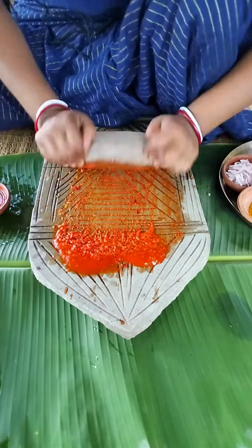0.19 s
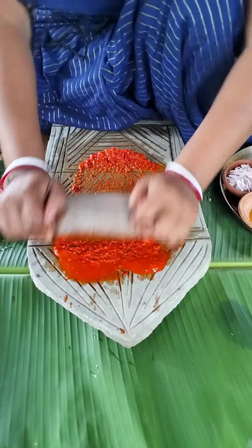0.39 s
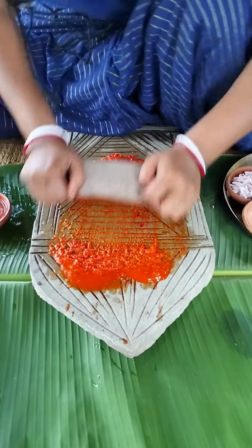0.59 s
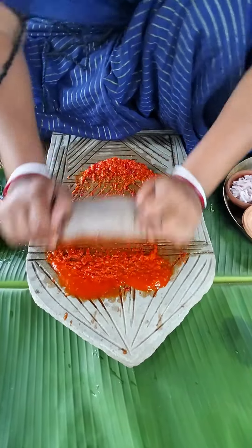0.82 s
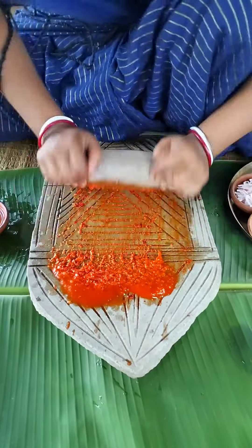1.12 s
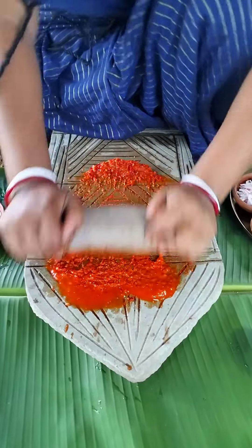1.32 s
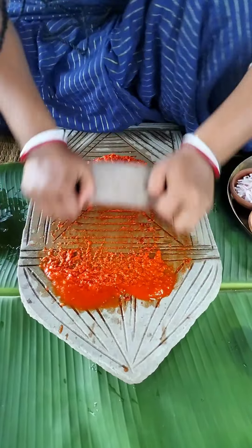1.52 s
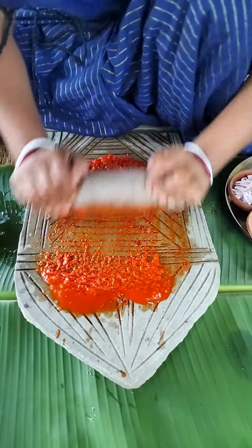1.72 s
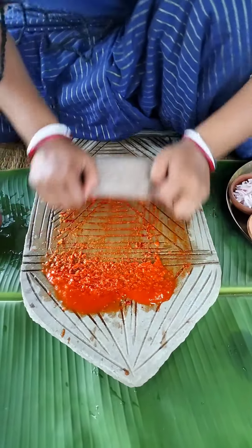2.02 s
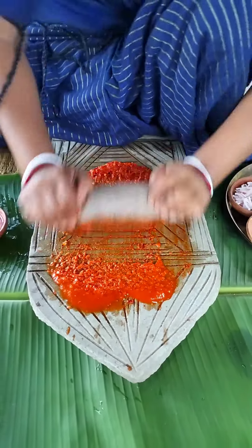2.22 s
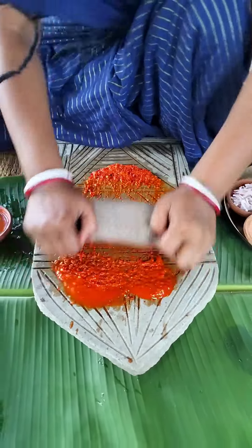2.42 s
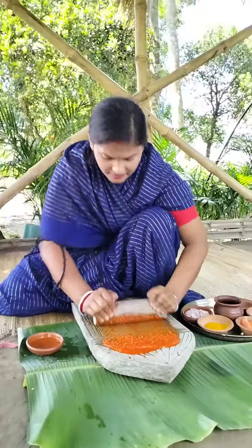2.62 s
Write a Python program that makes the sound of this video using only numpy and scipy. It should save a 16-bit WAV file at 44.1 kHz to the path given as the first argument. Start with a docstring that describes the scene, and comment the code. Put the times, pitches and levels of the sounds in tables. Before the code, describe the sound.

A stone roller scrapes wet, gritty paste over a grooved slab for nearly three seconds. Muffled rasping pushes start near 0, 0.4, 0.9, 1.35, 1.8 and 2.3 s; pulls between them squeak around 830 Hz, loudest near 1.7 s. Grit cracks, paste hisses and smacks, the slab knocks dully. Faint whistles glide early. Low air buffets hit the close stereo microphone, hardest right at 2.26 s, over soft outdoor hush.

```python
"""A stone roller is pushed and pulled over wet spice paste on a grooved slab, about two round trips a second.
Crushed grit rasps in the stones' resonances; the roller catches on grooves in short squeaky rings.
Grit cracks, the paste hisses and smacks, and the slab knocks dully. Faint whistles slide in pitch.
Air buffets the two microphone ports in low thumps, over a quiet outdoor hush."""
import sys
import numpy as np
from scipy import signal
from scipy.fft import rfft, irfft, next_fast_len
from scipy.io import wavfile
from scipy.ndimage import uniform_filter1d, minimum_filter1d, map_coordinates

SR = 44100
rng = np.random.default_rng(int(sys.argv[2]) if len(sys.argv) > 2 else 0)


def unload_wav(signal):
    """Save mono or channel-first audio to the path in sys.argv[1] as 16-bit WAV at rate SR, clipped to [-1, 1]."""
    wavfile.write(
        sys.argv[1],
        SR,
        np.round(np.clip(np.atleast_2d(signal).T, -1, 1) * 32767).astype(np.int16),
    )


N = 123480  # length in samples: 2.8 s

# forward strokes (start [s], length [s], ring [dB], rasp [dB], scrape [dB]); ring and rasp before muffling
PUSHES = [(-.06, 0.22, -26, -33, -42), (.42, 0.22, -26.5, -33.5, -44), (.885, 0.2, -25.5, -32.5, -40),
          (1.35, 0.23, -27.5, -36, -42), (1.825, 0.23, -23, -33, -39.5), (2.315, 0.24, -27.5, -34, -39.5)]
# backward strokes, same columns
PULLS = [(.195, 0.25, -30.5, -41, -48), (.66, 0.23, -29.5, -40.5, -47), (1.13, 0.22, -28.5, -34.5, -42.5),
         (1.61, 0.22, -28.5, -32.5, -43.5), (2.068, 0.26, -27.5, -36, -43.5), (2.68, 0.27, -34, -40, -43.5)]
# how each layer follows a stroke: (attack, hold, release) [shares of the stroke's length]
PUSH_SHAPE = {"ring": (0.18, 0.33, 0.3), "rasp": (0.043, 0.24, 0.6), "scrape": (0.34, 0.2, 0.59)}
PULL_SHAPE = {"ring": (0.066, 0.39, 0.45), "rasp": (0.1, 0.2, 0.57), "scrape": (0.13, 0.19, 1)}
# the roller's resonances on a pull (pitch [Hz], width [Hz], level [dB])
ROLLER_MODES = [(820, 27.5, 5), (2031, 45, -14.5)]
# resonances that grit excites in the two stones (pitch [Hz], width [Hz], level [dB])
STONE_MODES = [(461.5, 33, 7), (1078, 122, 7), (1420, 210, -7.5), (1746, 127, -3), (1970, 37, -2)]
# leaning on the roller widens its resonances and lowers them
PUSH_DAMPING, PUSH_DETUNE_HZ = 1.37, -4
# tone colour of the scrape and of the paste's fizz (frequency [Hz], relative level [dB])
SCRAPE_COLOUR = [(200, 14), (1500, -3), (3450, 4), (4400, 6), (7000, -0.5), (8600, -8.5), (15000, -10)]
PASTE_COLOUR = [(1000, -95), (7500, -1), (8900, -18), (10300, 0), (12500, -0.5), (16000, -16)]
PASTE_DB = -7.5  # fizz, relative to the scrape
# tone colour of the air rumble (frequency [Hz], relative level [dB])
AIR_COLOUR = [(20, -38), (45, 1), (110, 0.5), (250, -13.5), (2000, -68)]
# air rumble on each port (time [s], level [dB])
AIR_LEFT = [(.33, -30.5), (.47, -15.5), (.6, -27.5), (.8, -21.5), (.95, -34.5), (2.2, -31), (2.54, -24),
            (2.57, -39)]
AIR_RIGHT = [(.2, -27), (.64, -30.5), (.74, -20.5), (.85, -32.5), (1.08, -19), (1.2, -31), (1.719, -36.5),
             (1.95, -17), (2.08, -24), (2.25, -14), (2.541, -18.5), (2.571, -41)]
# single buffets of air on the left, then the right port (time [s], peak level [dB])
PUFFS = {"left": [(.491, -12.5), (.625, -10), (2.285, -14)], "right": [(.102, -14), (1.288, -10),
         (1.438, -10.5), (1.826, -11), (1.936, -7), (2.003, -5), (2.111, -8), (2.241, -10), (2.262, 0.5)]}
PUFF_HZ, PUFF_WIDTH_S = 90, 0.0071  # middle pitch, scattered for each puff; time to fall to 1/e
# tone colour of the outdoor hush (frequency [Hz], relative level [dB])
HUSH_COLOUR = [(300, 4.5), (1400, 8), (8800, -10), (12000, -4.5)]
HUSH_DB = -48.5
# low resonances of the slab (pitch [Hz], width [Hz], level [dB])
SLAB_MODES = [(467, 20, -6), (376, 62, -7)]
# the slab rocks dully as the roller turns (time [s], level [dB])
ROCKS = [(0.098, -27.5), (1.02, -33), (1.509, -31), (2.583, -29.5)]
ROCK_T60_S = 0.11  # time to fade by 60 dB, as for every T60 here
# wet paste smacks (time [s], level [dB])
SMACKS = [(.113, -37.5), (.375, -31), (0.606, -37), (.838, -32.5), (0.886, -32), (1.073, -32.5),
          (1.21, -29.5), (1.324, -34), (1.545, -30), (1.79, -29.5), (2.265, -32), (2.55, -37), (2.632, -34),
          (2.664, -33.5)]
# tone colour of a smack (frequency [Hz], relative level [dB])
SMACK_COLOUR = [(400, -51), (1100, -3.5), (7500, 8), (11500, 9), (16000, 6.5)]
SMACK_T60_S = 0.036
# faint whistling glides late in the forward strokes (start [s], first pitch [Hz], last pitch [Hz])
GLIDES = [(0.121, 1650, 1420), (.55, 1630, 1480), (1.04, 1270, 1526)]
GLIDE_S, GLIDE_DB = 0.072, -50.5  # length, peak level
# the roller catches on a groove (time [s], level [dB], pitch [Hz])
CATCHES = [(.222, -14.5, 827), (.237, -17, 832), (.293, -12.5, 833), (.441, -17, 802), (.725, -14, 815),
           (.753, -14.5, 770), (.762, -9, 837), (1.172, -14.5, 828), (1.2, -7.5, 834.5), (1.222, -9, 830),
           (1.234, -14, 860), (1.634, -11.5, 829), (1.671, -7, 834), (1.683, -0.5, 819), (1.696, -3.5, 816),
           (2.109, -14, 850), (2.14, -8, 839.5), (2.155, -7.5, 850), (2.17, -8, 836), (2.228, -20, 820),
           (2.325, -18, 870), (2.4, -13.5, 812), (2.527, -19.5, 860), (2.582, -18, 847.5),
           (2.743, -18.5, 878)]
CATCH_ATTACK_S, CATCH_HOLD_S, CATCH_T60_S = 0.0039, 0.0069, 0.063
CATCH_ROUGH = 0.15  # grit roughens the ring by this share
# hard grit cracks under the roller (time [s], level [dB])
CRACKS = [(0.223, -18.5), (0.247, -20.5), (0.38, -28), (0.444, -22.5), (1.683, -11.5), (1.695, -16.5),
          (2.108, -18.5), (2.162, -17.5), (2.528, -24)]
ROOM_T60_S, ROOM_DB = 0.07, -8.5  # fading and level of the reflections
RIGHT_DB = 2  # scrape, paste and cracks are this much stronger on the right
LEFT_LEAD_S = .00006  # the work reaches the left port first by this time
TOP_HZ = 15700  # nothing is kept from here up


def amp(db):
    """Turn dB into a plain gain."""
    return 10 ** (np.asarray(db) / 20)


def unit(x):
    """Scale x to an average strength (rms) of 1."""
    return x / np.sqrt(np.mean(x ** 2) + 1e-20)


def wobble(rate):
    """A smooth random curve through `rate` random points a second."""
    points = rng.standard_normal(int(N * rate / SR) + 4)
    return map_coordinates(points, [np.arange(N) * rate / SR])


def filtered(x, response):
    """Multiply the spectrum of x by a response that depends on frequency."""
    m = next_fast_len(N + SR // 2)
    spectrum = rfft(x, m) * response(np.fft.rfftfreq(m, 1 / SR))
    return irfft(spectrum, m)[..., :N]


def coloured(x, points):
    """Give x a tone colour from (frequency [Hz], level [dB]) points, at rms 1."""
    f, db = np.transpose(points)
    return unit(filtered(x, lambda hz: amp(np.interp(np.log(hz + 1), np.log(f), db))))


def resonated(x, modes, level=1):
    """Let x, at a given level curve, excite resonances; a steady level of 1 gives rms 1."""
    def body(f):
        return sum(amp(db) * 1j * f * w / (c * c - f * f + 1j * f * w) for c, w, db in modes)
    return filtered(level * x, body) / np.std(filtered(x, body))


def grains(rate, spread_db, apart):
    """Tiny random ticks of scattered size in stereo; `apart` sets the part the ports do not share."""
    present = rng.random((3, N)) < rate / SR
    heights = rng.standard_normal((3, N))
    scatter = np.clip(rng.standard_normal((3, N)), -2, 2)
    hits = present * heights * amp(spread_db * scatter)
    return unit(hits[0] + apart * hits[1:])


def burst(start, t60):
    """Level curve of a sudden sound that dies away."""
    t = np.maximum(np.arange(N) / SR - start, 0)
    attack = 1 - np.exp(-t / .0003)
    return attack * amp(-60 * np.minimum(t / t60, 2))


def swell(start, length, attack, hold, release):
    """Level curve of one stroke: it rises, holds, then loses 20 dB per release."""
    u = (np.arange(N) / SR - start) / length
    return np.clip(u / attack, 0, 1) * amp(-20 * np.maximum(u - attack - hold, 0) / release)


def effort(layer, ways=("push", "pull")):
    """Level of one layer over all strokes in the given directions."""
    level = np.zeros(N)
    for way in ways:
        strokes, shape = (PUSHES, PUSH_SHAPE) if way == "push" else (PULLS, PULL_SHAPE)
        for start, length, ring_db, rasp_db, scrape_db in strokes:
            db = {"ring": ring_db, "rasp": rasp_db, "scrape": scrape_db}[layer]
            level += amp(db) * swell(start, length, *shape[layer])
    return level


def leaning_right(x):
    """Raise the right side and lower the left by equal amounts."""
    return x * amp([[-RIGHT_DB / 2], [RIGHT_DB / 2]])


def radiated(x):
    """The small roller gives off little bass, and the paste muffles its top."""
    band = signal.butter(2, [480, 2900], "bandpass", fs=SR, output="sos")
    return signal.sosfilt(band, x)


def grinding():
    """Crushed grit excites the stones in a judder; the paste fizzes under the roller."""
    judder = wobble(130)
    slips = grains(rate=900, spread_db=-0.5, apart=0.26)
    pressed = [(hz + PUSH_DETUNE_HZ, width * PUSH_DAMPING, db) for hz, width, db in ROLLER_MODES]
    push_ring = effort("ring", ["push"]) * resonated(slips, pressed)
    pull_ring = effort("ring", ["pull"]) * resonated(slips, ROLLER_MODES)

    grit = grains(rate=800, spread_db=3, apart=.65) * amp(2.5 * judder)
    rasp = effort("rasp") * resonated(grit, STONE_MODES)

    scraping = grains(rate=7000, spread_db=6.0, apart=3.9) * amp(2.0 * judder)
    scrape = coloured(scraping, SCRAPE_COLOUR)
    fizz = grains(rate=6000, spread_db=4, apart=1.3) * amp(2.5 * wobble(90))
    paste = amp(PASTE_DB) * coloured(fizz, PASTE_COLOUR)
    hiss = effort("scrape") * (scrape + paste)
    return radiated(push_ring + pull_ring + rasp) + leaning_right(hiss)


def air():
    """Moving air makes a lumpy rumble, different on each port, with single stronger buffets."""
    t = np.arange(N) / SR
    level = np.array([amp(np.interp(t, *np.transpose(port))) for port in (AIR_LEFT, AIR_RIGHT)])
    lumps = amp(4 * np.array([wobble(45), wobble(45)]))
    out = level * coloured(rng.standard_normal((2, N)) * lumps, AIR_COLOUR)
    for port, puffs in enumerate(PUFFS.values()):
        for (start, db), scatter in zip(puffs, rng.standard_normal(len(puffs))):
            u = t - start
            hz = PUFF_HZ * np.exp(0.28 * scatter)
            bump = np.exp(-(u / PUFF_WIDTH_S) ** 2)
            out[port] -= amp(db) * bump * np.cos(2 * np.pi * hz * u)
    return out


def hush():
    """A quiet, steady outdoor background made of dense random ticks."""
    return amp(HUSH_DB) * coloured(grains(rate=SR, spread_db=3, apart=1.4), HUSH_COLOUR)


def slab():
    """The slab knocks softly on its bed: noise in its low resonances, in dying bursts."""
    level = sum(amp(db) * burst(start, ROCK_T60_S) for start, db in ROCKS)
    return level * resonated(rng.standard_normal(N), SLAB_MODES)


def smacks():
    """Wet paste lets go of the roller in brief crackles."""
    level = sum(amp(db) * burst(start, SMACK_T60_S) for start, db in SMACKS)
    crackle = grains(rate=12000, spread_db=3, apart=1.3)
    return leaning_right(level * coloured(crackle, SMACK_COLOUR))


def glides():
    """Thin, faint whistles: sine tones that slide in pitch, rising and fading in level."""
    out = np.zeros(N)
    for start, first_hz, last_hz in GLIDES:
        u = np.clip((np.arange(N) / SR - start) / GLIDE_S, 0, 1)
        hz = first_hz + (last_hz - first_hz) * u
        out += np.sin(np.pi * u) * np.sin(2 * np.pi * np.cumsum(hz) / SR)
    return amp(GLIDE_DB) * out


def catches():
    """Each catch on a groove stops the last ring and sets the roller ringing anew."""
    ring = np.zeros(N)
    for start, db, hz in CATCHES:
        t = np.maximum(np.arange(N) / SR - start, 0)
        ring *= np.clip(1 - t / CATCH_ATTACK_S, 0, 1)  # the old ring stops
        live = (t > 0) & (t < 2 * CATCH_T60_S)
        t = t[live]
        fade_db = -60 * np.maximum(t - CATCH_HOLD_S, 0) / CATCH_T60_S
        attack = np.minimum(t / CATCH_ATTACK_S, 1)
        ring[live] += amp(db + fade_db) * attack * np.sin(2 * np.pi * hz * t)
    return ring * (1 + CATCH_ROUGH * wobble(900))


def cracks():
    """Grit snaps between the stones: one hard, bright blow to their resonances."""
    blow = np.gradient(1. * (np.arange(N) == 1))
    ringing = resonated(blow, STONE_MODES)
    knock = radiated(radiated(ringing))[:SR // 10]  # doubly muffled under the roller
    hits = np.zeros(N)
    for start, db in CRACKS:
        hits[round(start * SR)] = amp(db)
    return leaning_right(signal.fftconvolve(hits, knock / np.abs(knock).max())[:N])


def shelter(x):
    """Short reflections from the ground and the open shelter: a fading tail of random echoes."""
    t = np.arange(SR // 4) / SR
    fade = amp(-60 * t / ROOM_T60_S) * (t > .004)  # no echo in the first 4 ms
    tail = rng.standard_normal((2, len(t))) * fade
    return signal.fftconvolve(x, tail / np.linalg.norm(tail[0]), axes=1)[:, :N]


def scene():
    """The stones and paste, their reflections, the whistles, the air and the hush."""
    work = grinding() + slab() + smacks() + catches() + cracks()
    # shift the two sides in time by half the lead each, left earlier and right later
    work = filtered(work, lambda hz: np.exp(1j * np.pi * LEFT_LEAD_S * np.outer([1, -1], hz)))
    return work + amp(ROOM_DB) * shelter(work) + glides() + air() + hush()


def record(dry):
    """A limiter turns both sides down at the strongest peaks; then the band limit cuts the top."""
    need = np.minimum(1, .9 / (np.abs(dry).max(axis=0) + 1e-20))
    gain = uniform_filter1d(minimum_filter1d(need, size=440), size=440)  # smoothed over about 10 ms
    return filtered(dry * gain, lambda hz: hz < TOP_HZ)


dry = scene()
out = record(dry)
unload_wav(out)
```